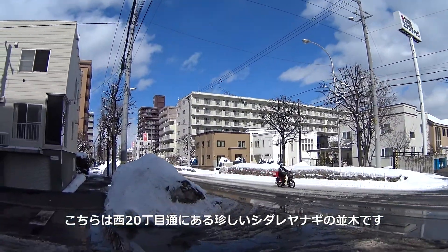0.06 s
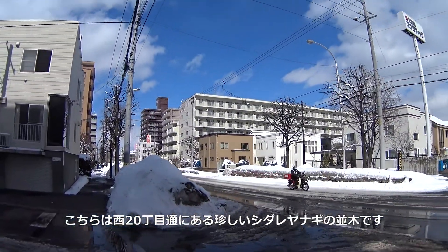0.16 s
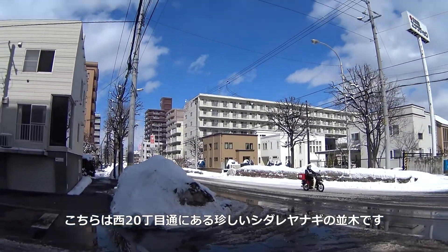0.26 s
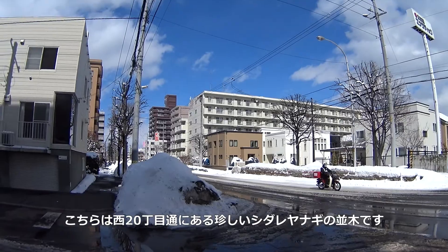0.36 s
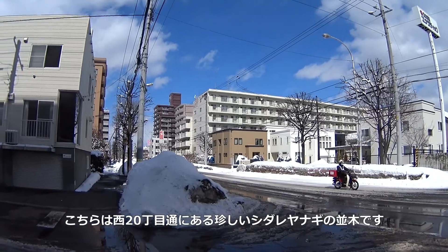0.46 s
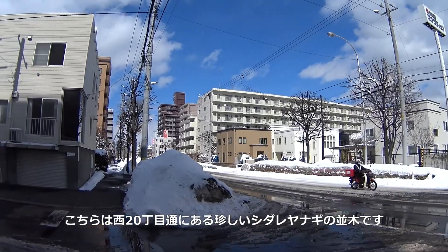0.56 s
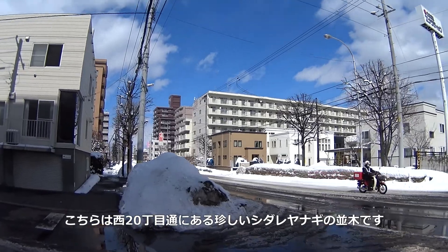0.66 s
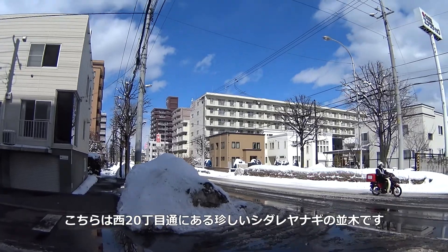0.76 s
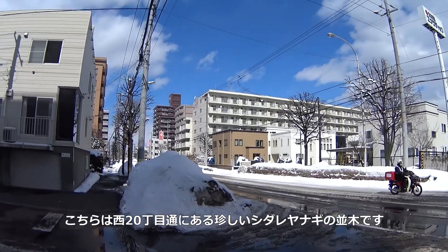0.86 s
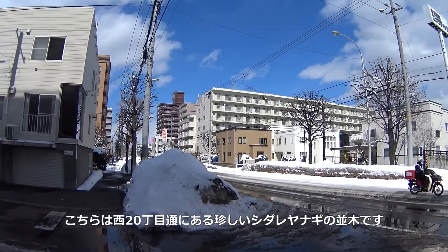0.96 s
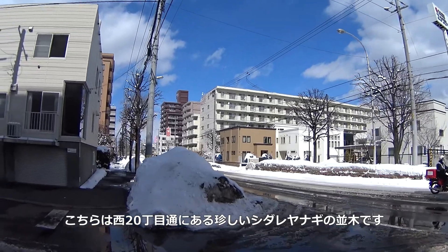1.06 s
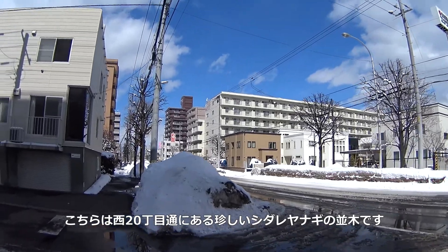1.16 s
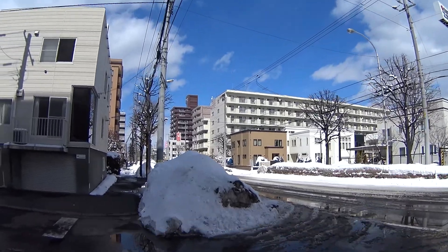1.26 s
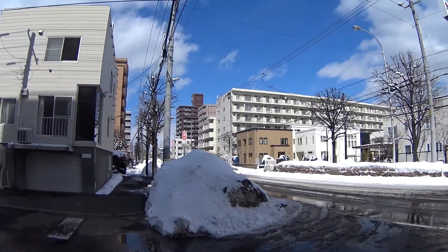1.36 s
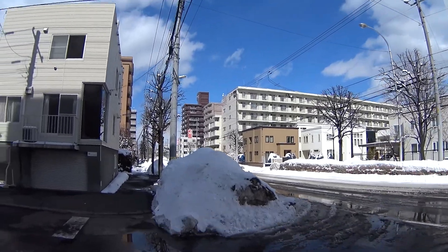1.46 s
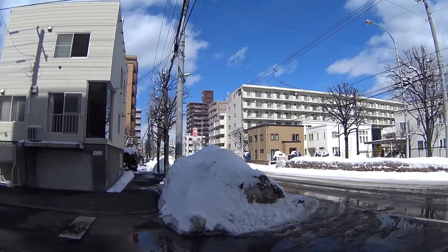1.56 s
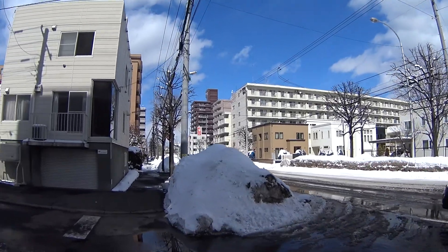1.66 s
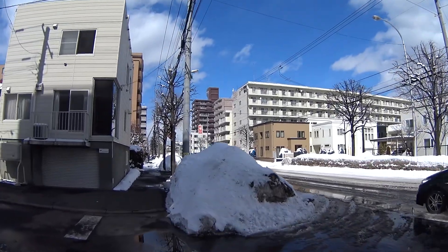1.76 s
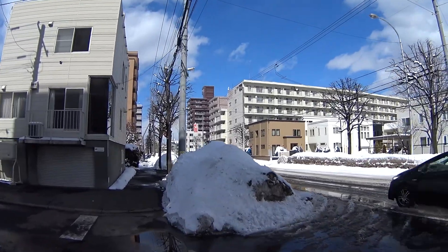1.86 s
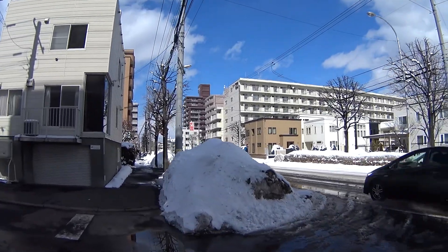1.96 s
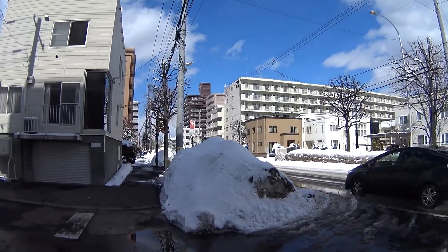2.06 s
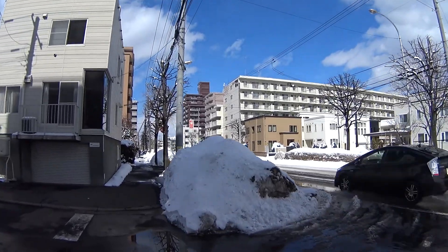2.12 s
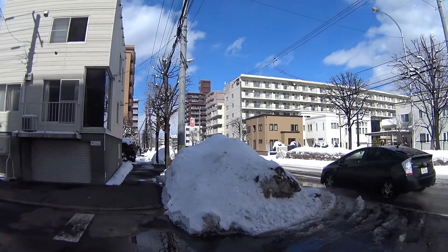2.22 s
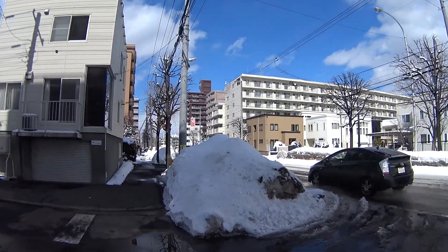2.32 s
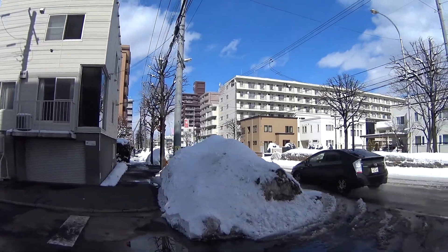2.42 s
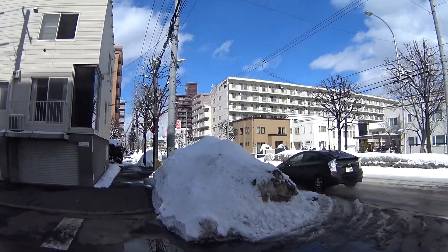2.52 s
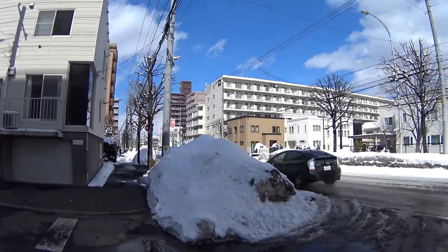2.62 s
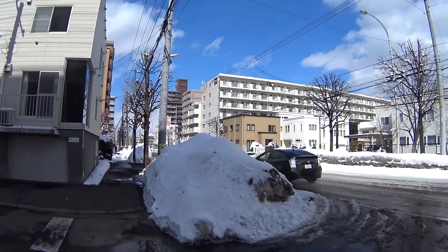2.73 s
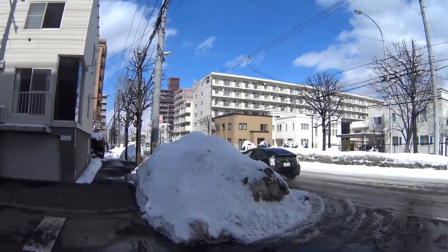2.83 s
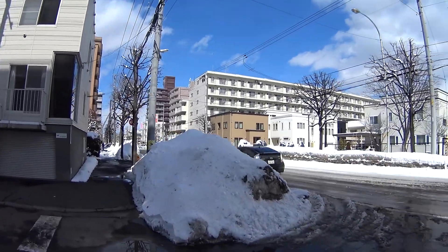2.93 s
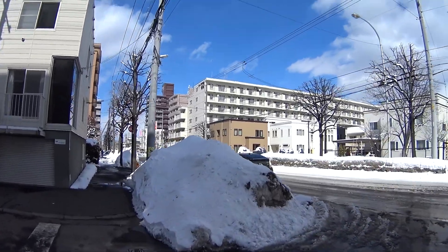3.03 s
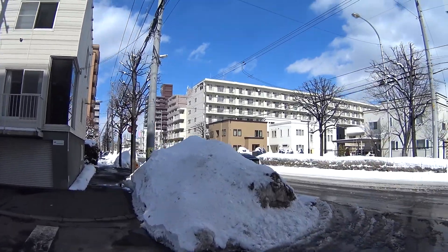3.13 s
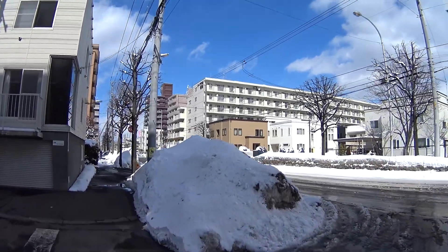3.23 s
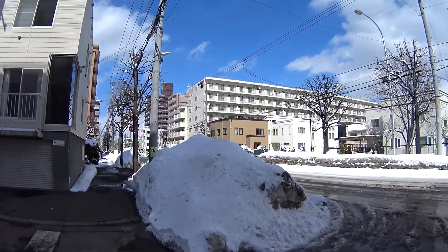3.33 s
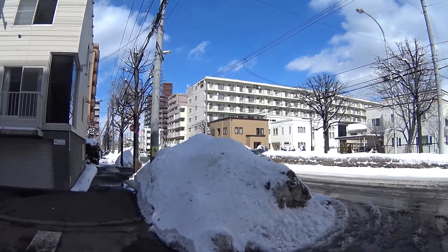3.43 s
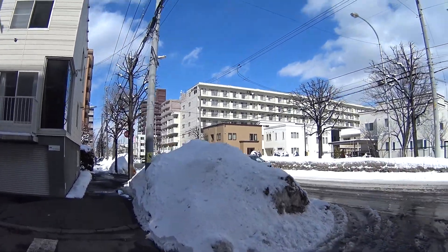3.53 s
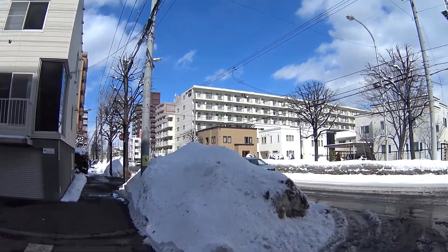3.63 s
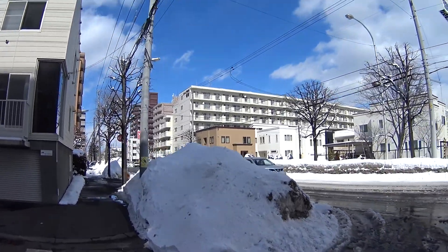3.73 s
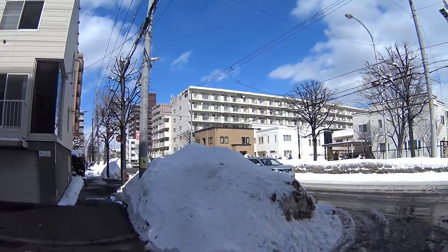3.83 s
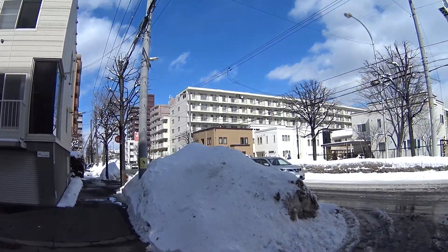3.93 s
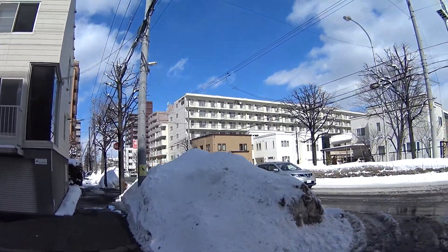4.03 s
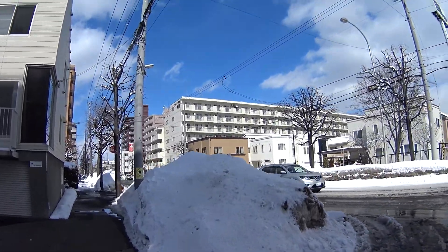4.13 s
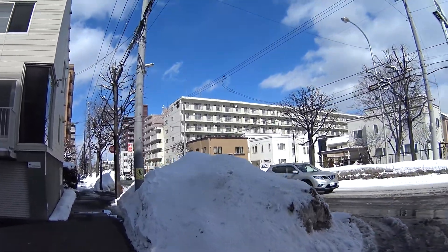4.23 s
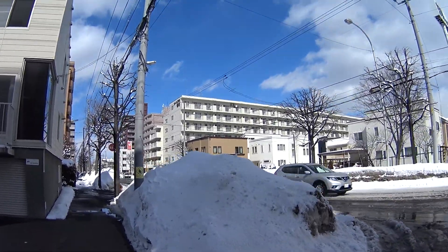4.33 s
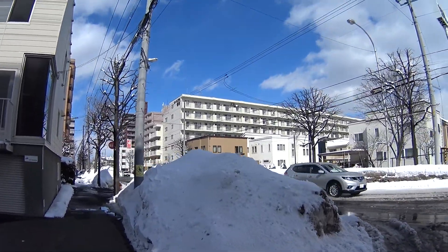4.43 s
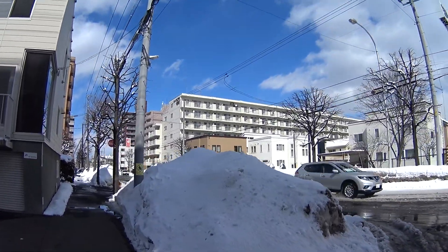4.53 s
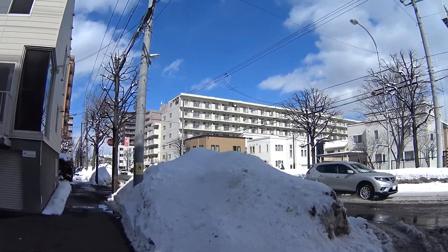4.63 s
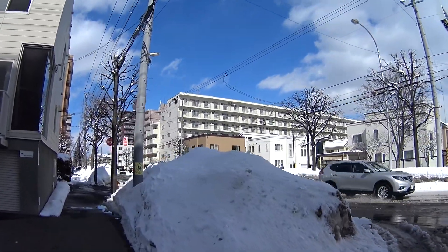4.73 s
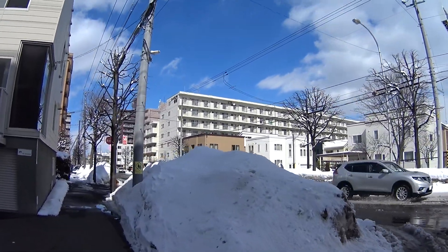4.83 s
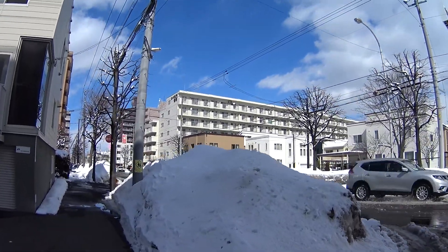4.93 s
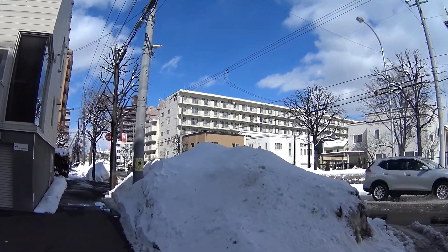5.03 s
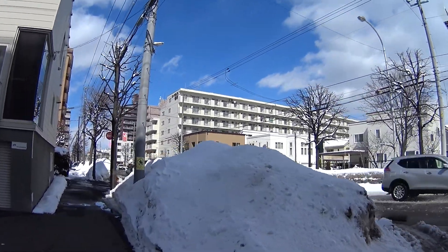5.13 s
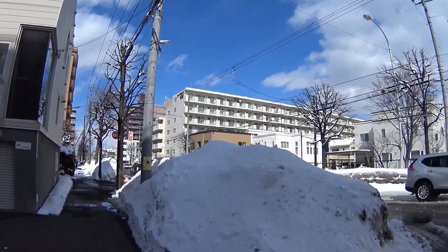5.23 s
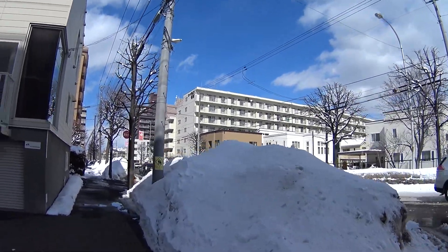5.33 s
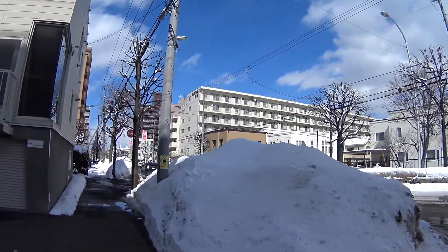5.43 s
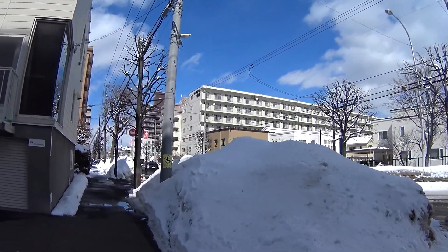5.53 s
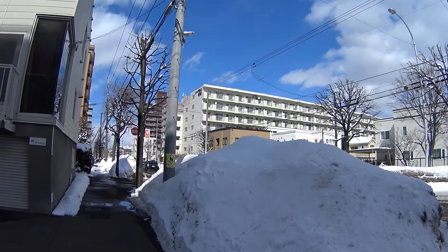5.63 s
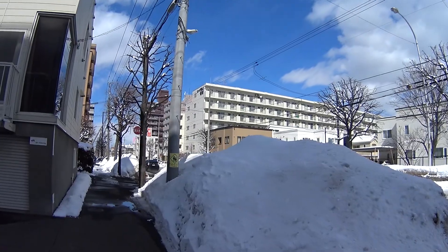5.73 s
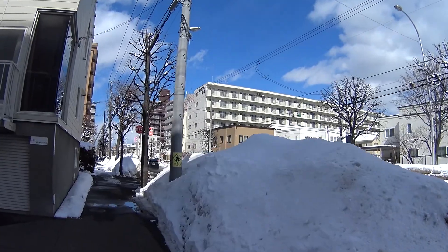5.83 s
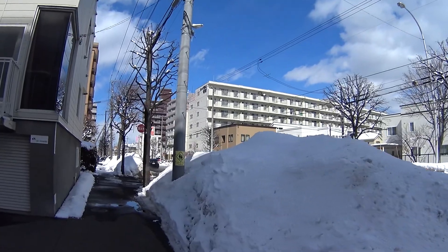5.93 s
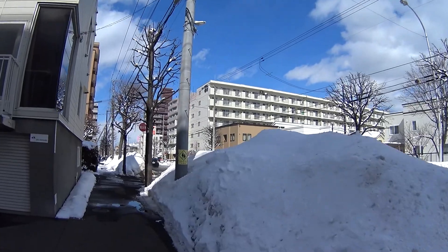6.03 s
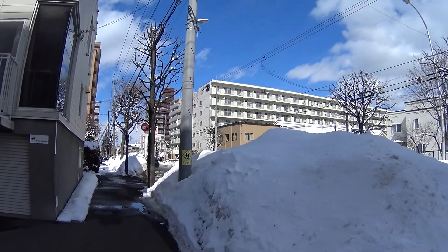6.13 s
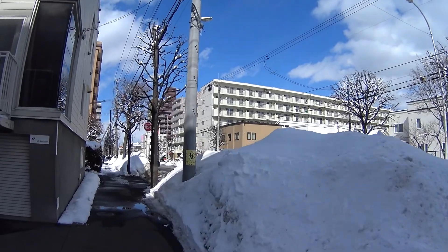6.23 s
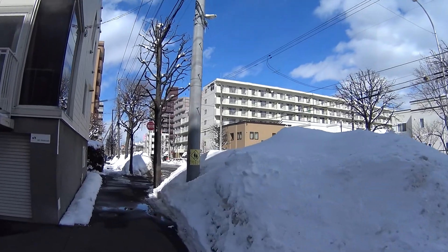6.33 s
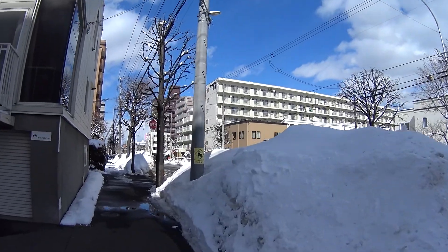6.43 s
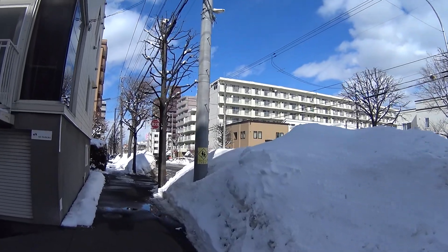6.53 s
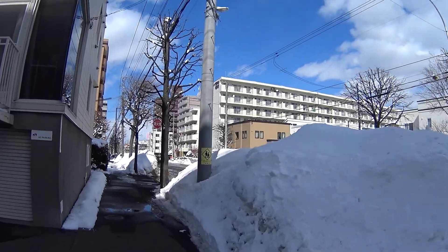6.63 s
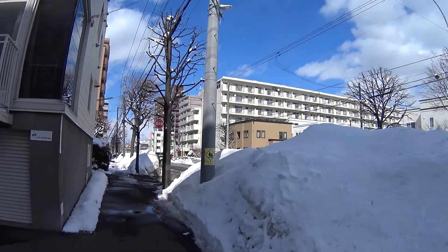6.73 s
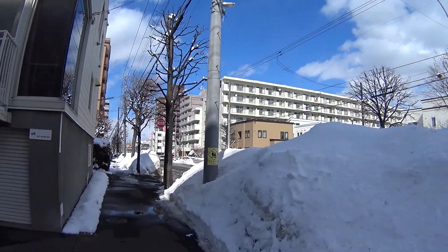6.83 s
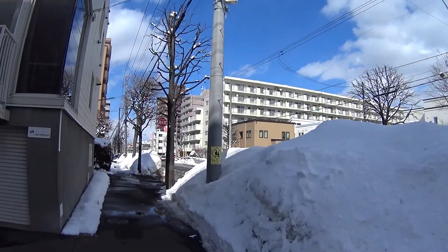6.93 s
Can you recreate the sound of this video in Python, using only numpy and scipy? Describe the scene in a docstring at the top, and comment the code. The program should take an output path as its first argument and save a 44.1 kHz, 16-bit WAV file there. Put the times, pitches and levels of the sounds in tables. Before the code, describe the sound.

Cars hiss past on a wet, slushy street, spray swelling and fading twice, with faint boot crunches and soft handling thuds close by.

```python
"""A slushy street, where two cars pass while someone walks along holding a small camera with two sound ports.
The tyres are shaped noise: a roar and spray heard first from the right, then ahead, then from the right again.
Boots crunch as bursts of tiny clicks, and jolts thud through the hand as short fading tones.
A breeze rumbles on the ports over a low street hum, both made of slowly wavering noise.
The camera's housing colours the spray and the crunch."""
import sys
import numpy as np
from scipy import signal
from scipy.fft import rfft, irfft, next_fast_len
from scipy.io import wavfile

SR = 44100
rng = np.random.default_rng(int(sys.argv[2]) if len(sys.argv) > 2 else 0)


def inscribe(sig):
    """Save sig as 16-bit PCM at rate SR to the path in sys.argv[1].

    A 1-D sig is mono; a 2-D sig holds one channel per row.
    Samples are clipped to [-1, 1] before scaling.
    """
    pcm = np.round(np.clip(np.atleast_2d(sig).T, -1, 1) * 32767)
    wavfile.write(sys.argv[1], SR, pcm.astype(np.int16))


N = 307377   # length in samples, about 7 s

# Street hum. Each row: time in seconds, level in dB.
HUM_LEVEL = [(0, -74.5), (.4, -74.5), (.7, -73), (1.2, -71), (2.1, -74), (2.5, -71), (2.9, -76.5),
             (3.1, -75), (3.35, -78), (3.9, -76.5), (4.1, -75), (4.4, -75), (4.8, -74.5), (5.2, -71.5),
             (5.8, -73), (6.2, -73), (6.97, -75)]
# Tone of the hum. Each row: pitch in Hz, relative strength in dB per Hz.
HUM_COLOUR = [(88, -45.5), (150, -5.5), (188, -7.5), (253, -13.5), (464, -2.5), (684, -7), (1040, -5),
              (1300, -4), (1690, -26), (2860, -120)]
# Low drone of the cars. Each row: pitch in Hz, relative strength in dB per Hz.
DRONE_COLOUR = [(150, -40), (220, -6.5), (300, -2), (400, -8), (600, -40)]
DRONE_DB, DRONE_FOLLOWS = -88, 0.6   # average level in dB, share of the spray's rise and fall

# Breeze on the ports. Each row: time in seconds, level in dB.
BREEZE_LEVEL = [(0.0, -67.5), (0.85, -69), (1.12, -72), (1.16, -61), (1.22, -69.5), (1.98, -75.5),
                (2.27, -66), (2.29, -85), (2.35, -58), (2.39, -77), (2.58, -67), (2.6, -60), (2.66, -68),
                (2.99, -71.5), (3.07, -62), (3.3, -77), (3.36, -67.5), (3.78, -72), (4.06, -63.5),
                (4.1, -54), (4.23, -73), (4.29, -63), (4.33, -67), (4.64, -65.5), (4.85, -77), (4.95, -66),
                (5.12, -69.5), (5.82, -68), (5.86, -64), (5.9, -71.5), (6.09, -65), (6.33, -71.5),
                (6.54, -64.5), (6.74, -76), (6.76, -67), (6.97, -73.5)]
# Tone of the breeze. Each row: pitch in Hz, relative strength in dB per Hz.
BREEZE_COLOUR = [(8.8, -28), (15, -3.5), (38, 2.5), (63, -0.5), (133, -9.5), (188, -31.5), (260, -29.5),
                 (340, -40), (570, -120)]
FLUTTER_DB = 1.3   # typical wavering of the breeze

# Jolts through the hand. Each row: start in seconds, strength in dB before softening, pitch in Hz,
# time to fade by 60 dB in seconds, first swing (1 up, -1 down).
JOLT_EVENTS = [(0.22, -53, 49.7, 0.14, 1), (0.255, -52, 54.7, 0.089, -1), (0.682, -54.5, 458, 0.044, 1),
               (1.141, -57, 76, 0.18, 1), (2.341, -49, 69, 0.068, 1), (2.602, -45.5, 59.7, 0.042, 1),
               (3.046, -52, 28.5, 0.23, -1), (3.074, -43.5, 80.4, 0.018, 1), (3.169, -53, 70, 0.05, 1),
               (4.06, -51, 25, 0.1, -1), (4.076, -49, 523, 0.018, -1), (4.078, -42, 110, 0.021, -1),
               (4.09, -37, 105, 0.04, 1), (4.0914, -57, 333, 0.017, 1), (4.098, -47, 32, 0.08, 1),
               (4.128, -53, 65.6, 0.13, -1), (4.146, -57.5, 380, 0.035, -1), (4.152, -50, 62, .06, 1),
               (4.166, -48, 40, 0.066, 1), (4.283, -46.5, 71, 0.057, -1), (4.992, -54, 71, 0.15, 1),
               (5.7, -57, 74.6, 0.16, 1), (5.839, -67, 59, 0.043, 1)]
JOLT_LEFT, JOLT_LEFT_HZ = 0.21, 70.0   # share added at the left and taken off at the right, above this Hz

# Boots in slush. Each row: start in seconds, knock in dB, crunch in dB, ring of the crunch in dB,
# length in seconds (the press is strongest at half of it).
STEPS = [(0.126, -71, -65, -65, 0.057), (0.161, -75, -65, -57, 0.008), (0.174, -72.5, -65, -66, 0.02),
         (0.215, -78, -62, -56, 0.005), (0.223, -82, -62, -49.5, 0.0079), (0.612, -72, -55, -55, 0.01),
         (0.636, -74, -67, -58, 0.007), (0.663, -63, -63, -55, 0.011), (0.677, -70, -57, -67, 0.013),
         (0.693, -72, -65, -62, 0.015), (0.727, -66, -52, -65, 0.0056), (1.113, -67, -52, -50, 0.012),
         (1.267, -90, -54, -44.5, 0.013), (1.562, -70.5, -64, -73, 0.065), (2.032, -69, -67, -59, 0.077),
         (3.016, -72, -57.5, -55, 0.028), (3.067, -71, -62, -62, 0.032), (3.205, -72, -55, -75, 0.015),
         (3.501, -76.5, -59, -68, 0.06), (4.038, -79, -54, -64, 0.0069), (4.076, -60.5, -66, -70, 0.0053),
         (4.089, -64, -68, -70, 0.007), (4.105, -79, -69, -67, 0.012), (4.145, -72, -73, -70, 0.008),
         (4.16, -76, -76, -70, 0.01), (4.186, -76, -57, -63, 0.003), (4.284, -75, -70, -68, 0.0056),
         (4.51, -71.5, -71, -73, 0.083), (5.013, -67, -64, -67, 0.026), (6.395, -73, -67, -74, 0.011)]
# Boot resonances, each passed through twice. Each row: pitch in Hz, width of one pass in Hz, strength in dB
# relative to the others.
SOLE = [(270, 110, -3.5), (462, 370, 10.5), (653, 440, 6), (1000, 400, -14.5)]
# Crunch is broader than spray. Each row: pitch in Hz, dB added to the housing's tone.
CRUNCH_COLOUR = [(900, 0.5), (1500, 4), (2200, 3), (2700, -3.5), (3400, 0), (5000, 5), (7500, 4)]
CRUNCH_RING_HZ, CRUNCH_RING_WIDTH_HZ = 2450, 320   # crushed slush rings briefly

# Passing cars. Each row: time in seconds, spray level in dB, tyre roar in dB, sizzle in dB.
# Roar and sizzle count only by how they rise and fall against the spray.
TRAFFIC = [(0, -58, -70, -62.5), (.55, -55, -71.5, -60.5), (.7, -53.5, -65, -58.5),
           (1.08, -52.5, -63.5, -55.5), (1.3, -49, -62.5, -50.5), (1.5, -47, -59, -50),
           (2.05, -46, -56, -49), (2.4, -44.5, -56.5, -49.5), (2.7, -47, -61.5, -51),
           (2.76, -49, -62.5, -53), (2.98, -53, -68, -59), (3.28, -56.5, -69.5, -63),
           (3.95, -55.5, -68.5, -62.5), (4.3, -52, -63.5, -59), (4.55, -49, -62.5, -53),
           (4.85, -45, -56, -53.5), (5.05, -49.5, -58, -53.5), (5.3, -45, -59, -52),
           (5.45, -48.5, -60, -53.5), (5.95, -49.5, -63.5, -55.5), (6.1, -52, -62, -58),
           (6.2, -51, -63, -58), (6.35, -55, -65, -60), (6.97, -56.5, -65.5, -62.5)]
# Where the loudest tyres are. Each row: time in seconds, direction (0 ahead, 1 right),
# cover (0 in the open, 1 hidden by the snow bank).
BEARING = [(0, 0.27, 0.22), (.8, 0.39, 0.074), (1.3, 1, 0.58), (1.75, 0.67, 0.51), (2.3, 0.2, 0.2),
           (3.5, 0.046, 0.19), (4.7, 0.17, 0.013), (5.3, 0.82, 0.38), (5.9, 1, 0.78), (6.4, 0.84, 0.9),
           (6.97, 0.79, 1)]
# Spray as heard through the housing. Each row: pitch in Hz, relative strength in dB per Hz.
HOUSING = [(410, -38.5), (700, -31), (1060, -34.5), (1450, -6.5), (1690, -5.5), (1870, -10.5), (2570, -1),
           (2790, 1), (3880, -9), (5000, -7.5), (5470, -15), (8260, -30), (10700, -43), (14000, -81),
           (22000, -120)]
# Tone when hidden by the bank. Each row: pitch in Hz, dB added when fully hidden.
BANK = [(600, 5), (900, 17), (1150, 16), (1450, -8.5), (1850, -4), (2150, -7), (2600, 5), (3300, 3.5),
        (4500, 2), (7000, 0.5), (10500, -13)]
# The ridge (strongest band) of the spray slides. Each row: time in seconds, level just under the ridge in dB.
UNDER_RIDGE = [(0, 2.5), (.56, 3), (1.05, -6), (1.28, 1.5), (1.48, 3), (1.56, -2.5), (1.65, 1), (1.7, 1),
               (1.8, -1), (2.05, -1.5), (2.15, -4), (2.5, -4.5), (2.95, 0), (3.3, -1), (3.9, 0.5),
               (4.7, -2.5), (4.8, 2.5), (4.88, -1.5), (5.05, -1.5), (5.4, -0.5), (6.0, 0.5), (6.13, 1.5),
               (6.3, 1.5), (6.97, 1)]
# How far each pitch follows that level. Each row: pitch in Hz, share of the level.
RIDGE_SWING = [(1800, 0.7), (2050, 0.54), (2350, 0.74), (2600, 0.51), (2950, -0.48), (3500, 0.019)]
MIST_FOLLOWS = 0.15   # near tyres are brighter: dB of fine mist per dB of spray, before each band's share
CLUMPS_FOLLOW = -0.25   # clumps merge into hiss as the spray swells: dB per dB of spray

# Tone of the scattered sound. Each row: pitch in Hz, dB added.
SCATTER_COLOUR = [(300, -20.5), (800, 10), (1500, 1), (2200, 5.5), (2700, -4.5), (3300, 2.5), (4800, -2.5),
                  (5700, 8), (6800, 8), (9000, 8)]
# Scattered share in dB: from ahead, extra from the right, then change per dB of spray.
SCATTER_DB, SCATTER_ASIDE_DB, SCATTER_FOLLOWS = -13, 2, -0.059

# Tone from ahead, where the ridge is higher and narrower. Each row: pitch in Hz, dB added.
AHEAD_RIDGE = [(1300, 2), (1550, -3), (1900, 1), (2150, 2.5), (2380, -5), (2520, 0.5), (2660, 2),
               (2850, -1.5), (3200, 0), (3800, 2)]
# Sound from ahead, left port against right. Each row: pitch in Hz, level gap in dB.
AHEAD_DB = [(800, 1), (1200, -4), (2100, 0.66), (3300, -0.1), (4800, -0.2), (6800, -0.5), (9500, 0)]
# Sound from ahead. Each row: pitch in Hz, phase by which the left leads in radians.
AHEAD_RAD = [(500, 0), (800, -.1), (1300, -.3), (2700, -.3), (4000, -.2), (5700, -.1), (6800, -.2),
             (9800, -.1)]
# Tone from the right. Each row: pitch in Hz, dB added.
RIGHT_RIDGE = [(1500, 0.35), (2000, 6), (2300, 6), (2550, 1), (2850, -1.5), (3200, -3.5), (3800, 0.3),
               (4600, -0.3)]
# Sound from the right, left port against right. Each row: pitch in Hz, level gap in dB.
RIGHT_DB = [(600, 3.5), (1200, 5.5), (1650, 1.5), (2150, 2.5), (2700, -1), (3300, -7), (3950, -2),
            (4800, -2.5), (5700, -1), (6800, -5.5), (8200, -13), (9800, -3)]
# Sound from the right. Each row: pitch in Hz, phase by which the left leads in radians.
RIGHT_RAD = [(400, 0), (800, -.5), (1300, -.9), (2150, -.5), (2750, -.8), (3300, -.5), (3950, -.1),
             (4800, -.3), (5700, -.5), (6800, -1.1), (8200, -.8), (9800, -.4)]

HISS_DB, CUTOFF_HZ = -102, 10890   # level of the steady hiss, top of the sound


def from_db(db):
    """Turn decibels into gain."""
    return 10 ** (np.asarray(db) / 20)


def rms_one(x):
    """Scale to an rms (average strength) of 1."""
    return x / np.sqrt(np.mean(x ** 2) + 1e-20)


def from_mean(x):
    """Keep only the rise and fall around the average."""
    return x - x.mean()


def in_time(rows):
    """Draw straight lines between the rows, giving each column one value a sample."""
    s, *columns = np.transpose(rows)
    return [np.interp(np.arange(N) / SR, s, column) for column in columns]


def at_hz(points, hz):
    """Read a curve at given pitches, with pitch on a log axis."""
    points = np.array(points)
    return np.interp(np.log(hz + 1), np.log(points[:, 0] + 1), points[:, 1])


def shaped(x, response):
    """Filter by a response given as a function of Hz."""
    size = next_fast_len(N + 4096)
    hz = np.arange(size // 2 + 1) * SR / size
    return irfft(rfft(x, size) * response(hz), size)[..., :N]


def drift(rate):
    """Slow random wandering of spread 1, made by smoothing noise twice above the rate in Hz."""
    r = np.exp(-80 * np.pi * rate / SR)
    # one value per 40 samples is enough; the first 2000 let the filter settle
    noise = rng.standard_normal(N // 40 + 2002)
    slow = signal.lfilter([1], [1, -2 * r, r * r], noise)[2000:]
    return np.interp(np.arange(N) / 40, np.arange(len(slow)), rms_one(slow))


def grains(per_s, spread_db):
    """Random clicks of uneven size and either sign, scaled to rms 1."""
    size_db = spread_db * np.minimum(rng.exponential(1, N), 5)
    clicks = from_db(size_db) * rng.choice([-1, 1], N)
    return rms_one(clicks * (rng.random(N) < per_s / SR))


def resonance(x, hz, width_hz):
    """A two-pole resonance that passes one band, with gain 1 at its top."""
    r = np.exp(-np.pi * width_hz / SR)
    feed = np.array([1, 0, -1]) * (1 - r * r) / 2
    return signal.lfilter(feed, [1, -2 * r * np.cos(2 * np.pi * hz / SR), r * r], x)


def pressing(length):
    """Weight comes on, then eases; the peak of 1 is at half the length."""
    age = np.arange(int(4 * abs(length) * SR)) / SR / abs(length)
    return np.e * 2 * age * np.exp(-2 * age)


def pair(colour, apart_db):
    """Coloured stereo noise of rms 1, mostly alike in both ports."""
    mid, side = shaped(rng.standard_normal((2, N)), lambda hz: from_db(at_hz(colour, hz)))
    return rms_one(mid + from_db(apart_db) * side * [[1], [-1]])


def ports(x, ridge, balance, lead):
    """One sound at both ports, with the tone, level gap and phase gap of its direction."""
    side = np.array([[.5], [-.5]])   # half of each gap goes to each port

    def response(hz):
        gain = from_db(at_hz(ridge, hz) + side * at_hz(balance, hz))
        return gain * np.exp(1j * side * at_hz(lead, hz))
    return shaped(x, response)


def street_hum(near_db):
    """Low noise wavers in level, and the cars' drone swells along with their spray."""
    hum_db = in_time(HUM_LEVEL)[0] + 1.0 * drift(14.0) + 0.8 * drift(23.0)
    hum = from_db(hum_db) * pair(HUM_COLOUR, apart_db=-8.0)
    drone = from_db(DRONE_DB + DRONE_FOLLOWS * near_db) * pair(DRONE_COLOUR, apart_db=-10.5)
    return hum + drone


def breeze():
    """Air on the ports is deep fluttering noise, nearly alike in both."""
    level_db = in_time(BREEZE_LEVEL)[0] + FLUTTER_DB * drift(12.0)
    return from_db(level_db) * pair(BREEZE_COLOUR, apart_db=-26.5)


def jolts():
    """Each jolt makes the camera body swing as a fading sine, softened above 500 Hz."""
    out = np.zeros(N)
    age = np.arange(SR // 3) / SR
    for s, db, hz, t60, swing in JOLT_EVENTS:
        at = round(s * SR)
        fading = from_db(db - 60 * age / t60)
        out[at:at + len(age)] += np.sign(swing) * fading * np.sin(2 * np.pi * hz * age)
    out = signal.sosfilt(signal.butter(1, 500.0, fs=SR, output="sos"), out)
    uneven = signal.sosfilt(signal.butter(1, JOLT_LEFT_HZ, "high", fs=SR, output="sos"), out)
    return out + JOLT_LEFT * uneven * [[1], [-1]]


def boots():
    """Each step crushes grains: a knock in the sole, and a crunch in the air that may ring."""
    weight = np.zeros((3, N + SR))   # knock, crunch and ring over time
    for s, *levels_db, length in STEPS:
        press = pressing(length)
        at = round(s * SR)
        weight[:, at:at + len(press)] += from_db(levels_db)[:, None] * press
    knock, crunch, ringing = weight[:, :N]
    grit = grains(per_s=4400.0, spread_db=2.5) + 1e-18
    sole = 0
    for hz, width, db in SOLE:
        sole = sole + from_db(db) * resonance(resonance(grit, hz, width), hz, width)
    air = rms_one(shaped(grit, lambda hz: from_db(at_hz(HOUSING, hz) + at_hz(CRUNCH_COLOUR, hz))))
    ring = rms_one(resonance(air, CRUNCH_RING_HZ, CRUNCH_RING_WIDTH_HZ))
    return knock * rms_one(sole), crunch * air + ringing * ring


def slush_noise(spray_db, clumps_db=-7):
    """Three hisses, one direct and two scattered, share short bursts where clumps of slush break up."""
    noise = rng.standard_normal((3, N))
    clumps = np.convolve(abs(grains(per_s=300.0, spread_db=0.5)), pressing(0.002))[:N]
    clumps = np.minimum(rms_one(clumps), 2.2)   # cap the strongest bursts
    gain = from_db(clumps_db + CLUMPS_FOLLOW * from_mean(spray_db))
    return noise * np.sqrt(1 + (gain * clumps) ** 2)


def tyres(hidden, splash_db=0.3, patchy_db=0.78):
    """Spray hiss is cut into bands that swell together with the cars and also waver alone."""
    spray_db, roar_db, sizzle_db = in_time(TRAFFIC)
    roar_swing = from_mean(roar_db - spray_db)
    sizzle_swing = from_mean(sizzle_db - spray_db)
    mist_swing = from_mean(MIST_FOLLOWS * spray_db)
    under_db, = in_time(UNDER_RIDGE)
    size = next_fast_len(N)
    hz = np.arange(size // 2 + 1) * SR / size
    spectrum = rfft(slush_noise(spray_db), size) * from_db(at_hz(HOUSING, hz))
    spectrum /= np.sqrt(np.mean(irfft(spectrum[0], size) ** 2))   # direct hiss to rms 1
    centres = np.geomspace(600, 11000, num=25)   # Hz
    place = np.interp(np.log(hz + 1), np.log(centres), np.arange(len(centres)))
    splash = splash_db * (drift(2.8) + drift(30.0))   # shared by all bands
    out = 0
    for k, centre in enumerate(centres):
        # each band fades into its neighbours
        band = irfft(spectrum * np.maximum(1 - abs(place - k), 0), size)[:, :N]
        # the pairs below are pitch in Hz and the share of the swing
        colour = at_hz([(1600, 1), (2300, 0.049)], centre) * roar_swing
        colour += at_hz([(2900, 0.15), (3900, 0.62), (5000, 1.3), (6500, 1.4)], centre) * sizzle_swing
        colour += at_hz([(5000, 0.4), (6500, 0.85)], centre) * mist_swing
        colour += hidden * at_hz(BANK, centre) + under_db * at_hz(RIDGE_SWING, centre)
        patchy = patchy_db * at_hz([(3000, 0.89), (5500, 0.89), (8000, 1.6)], centre) * drift(14.7)
        out = out + band * from_db(spray_db + colour + splash + patchy)
    return out[0], out[1:]


def scene():
    """Hum, breeze, walker and traffic add up at the two ports."""
    aside, hidden = np.clip(in_time(BEARING), 0, 1)
    near_db = from_mean(in_time(TRAFFIC)[0])
    background = street_hum(near_db) + breeze()
    knock, crunch = boots()
    direct, scattered = tyres(hidden)
    ahead = ports(direct * (1 - aside) + crunch, AHEAD_RIDGE, AHEAD_DB, AHEAD_RAD)
    right = ports(direct * aside, RIGHT_RIDGE, RIGHT_DB, RIGHT_RAD)
    scatter_db = SCATTER_DB + SCATTER_ASIDE_DB * aside + SCATTER_FOLLOWS * near_db
    around = shaped(scattered * from_db(scatter_db), lambda hz: from_db(at_hz(SCATTER_COLOUR, hz)))
    return background + jolts() + knock + ahead + right + around


def record(dry):
    """The top is cut steeply, and a faint steady hiss lies under all."""
    steep = signal.ellip(12, .3, 50, CUTOFF_HZ, fs=SR, output="sos")   # ripple 0.3 dB, 50 dB down above
    return signal.sosfilt(steep, dry) + from_db(HISS_DB) * rng.standard_normal(dry.shape)


dry = scene()
out = record(dry)
inscribe(out)
```